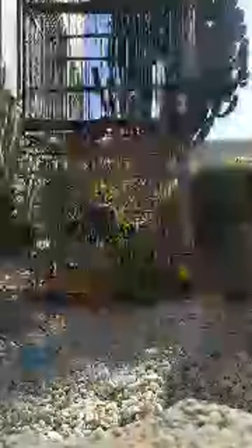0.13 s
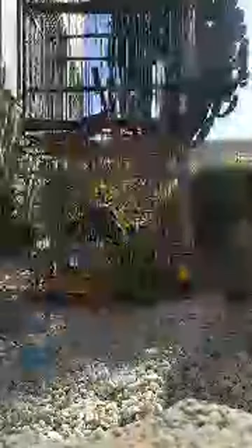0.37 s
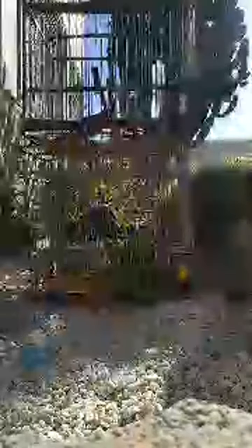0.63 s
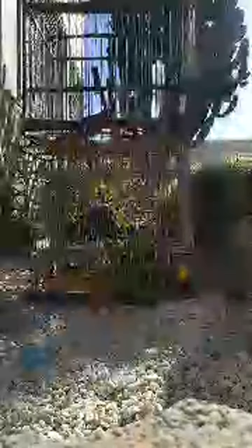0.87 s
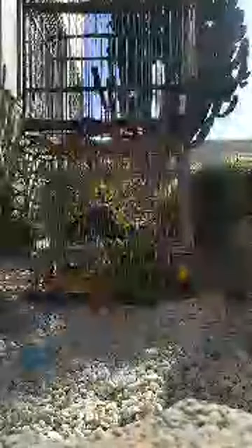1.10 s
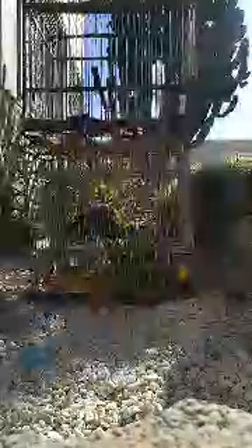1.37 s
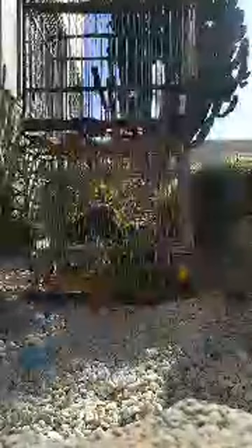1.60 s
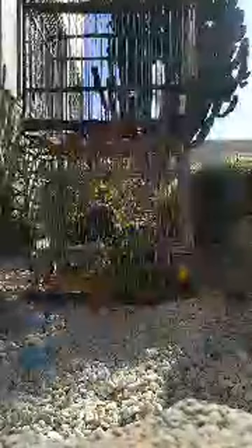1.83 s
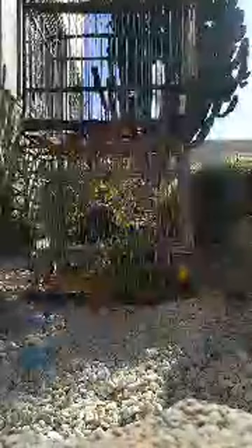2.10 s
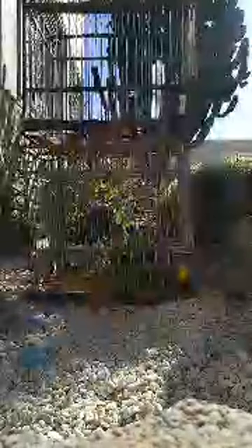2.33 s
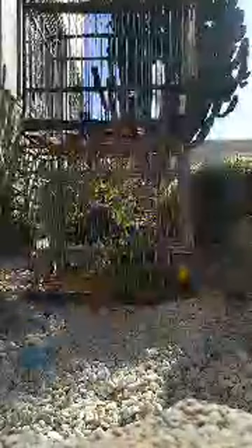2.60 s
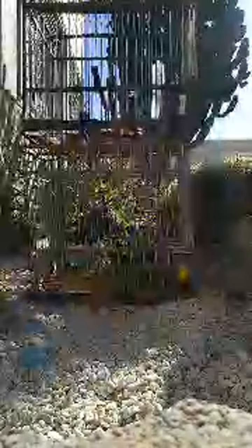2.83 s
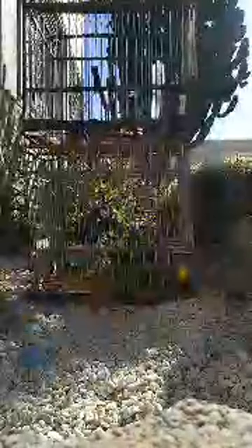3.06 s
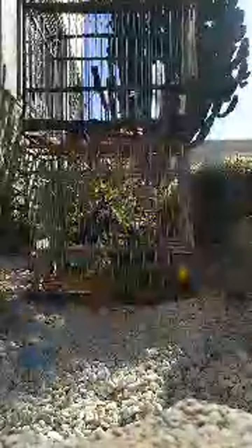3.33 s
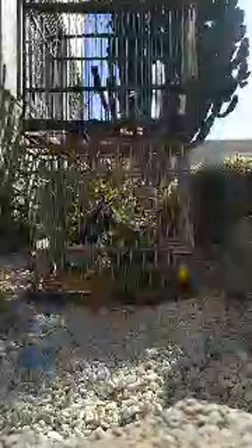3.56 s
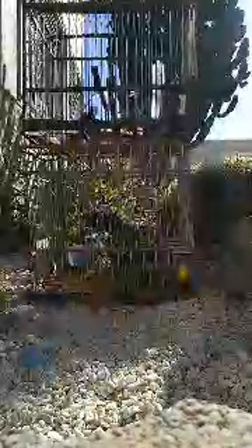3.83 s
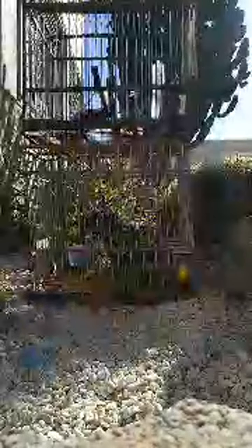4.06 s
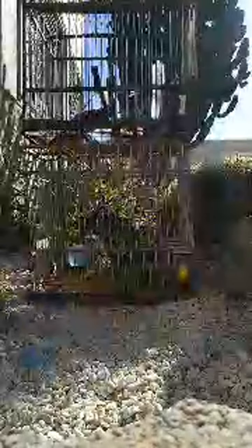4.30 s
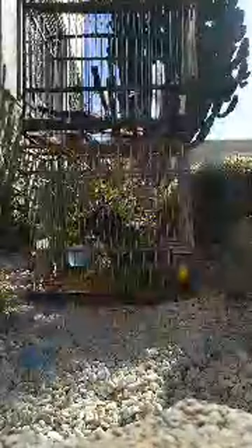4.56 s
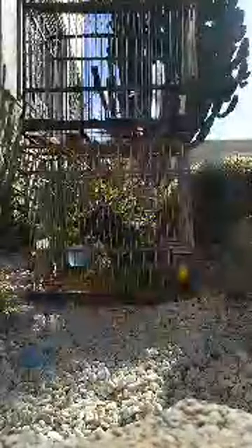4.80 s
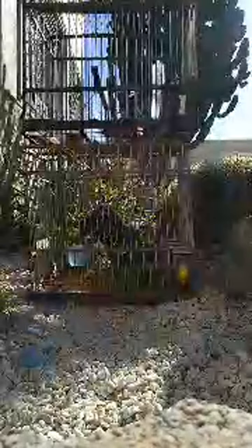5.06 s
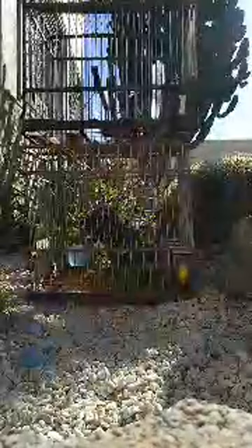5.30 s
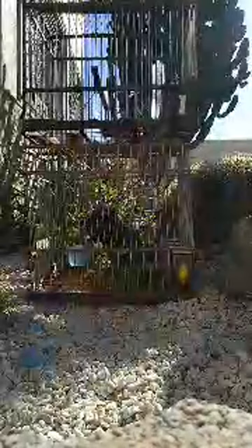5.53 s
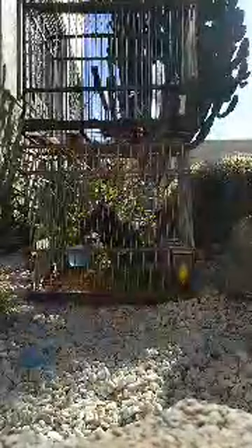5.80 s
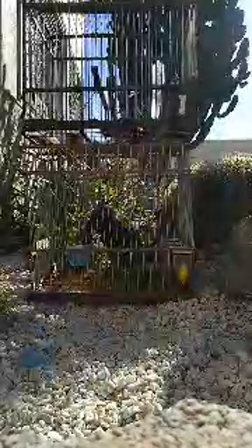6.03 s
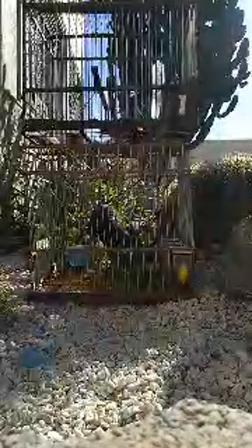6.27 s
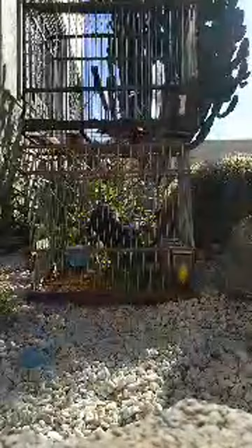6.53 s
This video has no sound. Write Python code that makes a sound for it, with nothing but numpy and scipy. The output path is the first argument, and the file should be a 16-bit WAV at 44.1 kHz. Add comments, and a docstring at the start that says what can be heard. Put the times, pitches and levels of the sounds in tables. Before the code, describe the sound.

Close bird song of clear whistles, husky chirps, raspy clucks and high squeaks outdoors, one hollow wooden thump, faint insects and a distant dove.

```python
"""A caged songbird sings in a walled garden: whistles, chirps, reedy notes, rasping chatter, chucks, squeaks.
Each note is a set of gliding partials, smeared by an unsteady membrane, with a broad hiss that follows its
loudness. Something wooden is knocked once (decaying modes), claws tick (noise bursts), a dove coos far off.
Echoes and a tail place these in the garden; insects shrill near 2 kHz, high hiss swells and far air murmurs,
all as shaped noise. Between some notes everything above the bass drops away for a moment."""
import sys
import numpy as np
from scipy import signal
from scipy.fft import rfft, irfft, next_fast_len
from scipy.io import wavfile
from scipy.ndimage import uniform_filter1d, map_coordinates

SR = 44100
rng = np.random.default_rng(int(sys.argv[2]) if len(sys.argv) > 2 else 0)


def dump_mix(stems):
    """Bounce the given channels to the path in sys.argv[1] as a 16-bit WAV at rate SR."""
    frames = np.atleast_2d(stems).T  # one column per channel
    limited = np.clip(frames, -1, 1)  # hard clip at full scale
    pcm = np.round(limited * 32767).astype(np.int16)
    wavfile.write(sys.argv[1], SR, pcm)


def boost_factor(decibels):
    """Convert a level in decibels to a linear amplitude factor."""
    exponent = np.asarray(decibels, float) / 20
    return 10 ** exponent


N = 293265
T = np.arange(N) / SR


def unit(x):
    """Scales to rms 1."""
    return x / np.sqrt(np.mean(np.abs(x) ** 2) + 1e-20)


def along(points, hz):
    """Reads a curve of (f/Hz, value) points on a log frequency axis."""
    f, value = np.transpose(points)
    return np.interp(np.log(hz + 1), np.log(f + 1), value)


def wobble(rate_hz, size=N):
    """A smooth random curve through rate_hz random knots a second."""
    knots = rng.standard_normal(int(size * rate_hz / SR) + 4)
    return map_coordinates(knots, [np.arange(size) * rate_hz / SR])


def shake(rate_hz, size):
    """A complex wobble: random in both strength and phase."""
    return (wobble(rate_hz, size) + 1j * wobble(rate_hz, size)) / np.sqrt(2)


def filtered(x, response):
    """Multiplies the spectrum of x by a response of frequency."""
    m = next_fast_len(N + SR // 2)
    return irfft(rfft(x, m) * response(np.fft.rfftfreq(m, 1 / SR)), m)[:N]


def hiss(spectrum):
    """White noise shaped to a spectrum, at rms 1."""
    return unit(filtered(rng.standard_normal(N), lambda hz: boost_factor(along(spectrum, hz))))


# broad hiss that follows each note's loudness, relative spectrum: f/Hz, level/dB per Hz
NOTE_HISS = [(700, -28), (1500, -17.5), (3000, -8), (5000, 4), (8300, -6.5), (9000, -11.5), (12000, -5.5),
             (15800, -14.5)]


def voice(notes, tones, rough, rough_hz, fray, scoop, round_, halo_db, hiss_db, arch,
          slide=0, lean=1, waver=0):
    """Partials on each note's pitch; an unsteady membrane smears them and spreads a halo, hiss follows them."""
    tone, hiss_swell = np.zeros(N + SR), np.zeros(N + SR)
    strength = np.sqrt(sum(boost_factor(db) ** 2 for _, db in tones) / 2)
    for start, length, middle_hz, db, *own_slide in notes:
        n, first = round(length * SR), round(start * SR)
        u = np.arange(n) / n
        way = np.clip(3 * u - 1.5, -1, 1)  # early to late
        # the pitch slides, and arches over the peak of effort
        pitch = middle_hz * (1 + (slide + sum(own_slide)) * way / 2 - arch * way ** 2)
        # the note slides up into place, less so when short
        pitch = pitch * (1 - scoop * min(1, length / .03) ** 2 * np.exp(-u * length / .005))
        # and sags as the air runs out
        pitch = pitch * (1 - .05 * np.exp((u - 1) * length / .004))
        # harsh notes waver in pitch
        phase = 2 * np.pi * np.cumsum(pitch * (1 + waver * wobble(70, n))) / SR
        swell = boost_factor(db) * np.sin(np.pi * u ** lean) ** round_  # lean over 1: slow swell, sudden stop
        steady = 1 - np.clip(rough + fray * u ** 2, 0, 1)  # positive fray: rougher as it ends
        for k, level_db in tones:
            clean = steady ** k  # upper partials smear first
            flutter = np.sqrt(clean) + np.sqrt(1 - clean) * shake(rough_hz * np.sqrt(k), n)
            flutter = flutter + boost_factor(halo_db) * shake(2200, n)
            partial = flutter * np.exp(1j * (k * phase + rng.uniform(0, 2 * np.pi)))
            tone[first:][:n] += boost_factor(level_db) / strength * swell * partial.real
        hiss_swell[first:][:n] += swell * (0.15 + u)  # weighted towards the note's end
    return tone[:N] + boost_factor(hiss_db) * hiss_swell[:N] * hiss(NOTE_HISS)


# clear notes: start t/s, length t/s, mid-note f/Hz, level/dB, then (whistles only) slide/share of f
WHISTLES = [(1.01, .038, 2895, -17, -.014), (1.052, .02, 2920, -22, .04), (1.135, .037, 2925, -14, -.022),
            (1.176, .027, 2940, -23, 0), (1.275, .037, 2915, -13, -.027), (1.316, .022, 2895, -19, .02),
            (3.136, .021, 3165, -18, -.057), (3.194, .035, 3205, -10, -.02), (3.23, .024, 3200, -12, -.012)]
PIPINGS = [(.28, .06, 1430, -34), (.365, .06, 1546, -31)]
REEDY = [(.022, .048, 2005, -26), (6.055, .027, 2018, -27), (6.175, .05, 2020, -26),
         (6.465, .03, 1795, -32), (6.497, .03, 1790, -20), (6.545, .056, 1786, -17),
         (6.632, .033, 1780, -32)]
LEAD_INS = [(1.502, .02, 2475, -27.5), (1.826, 0.024, 2520, -29), (2.716, 0.017, 2800, -30)]
# partials of the clear notes: multiple of the pitch, relative level/dB
WHISTLE_TONES = [(.5, -44), (1, 0), (1.5, -42), (2, -41)]
PIPING_TONES = [(1, -4), (2, -11.5), (3, -28.5), (4, -54)]
REEDY_TONES = [(1, -18.5), (2, 11), (3, -0.5), (4, -7.5), (5, -28.5)]  # hoarse notes share these
LEAD_IN_TONES = [(1, 2), (1.5, -14.5)]


def clear_notes():
    """Whistles, pipings, reedy notes and lead-ins to chirps: the membrane stays mostly steady."""
    clear = voice(WHISTLES, WHISTLE_TONES, rough=.02, rough_hz=265, fray=.15, scoop=.015, round_=.55,
                  halo_db=-30, hiss_db=-42, arch=.006, lean=1.4, waver=.003)
    clear += voice(PIPINGS, PIPING_TONES, rough=.048, rough_hz=121.2, fray=.057, scoop=.01, round_=.37,
                   halo_db=-19, hiss_db=-25, arch=.03, slide=-.03, waver=.006)
    clear += voice(REEDY, REEDY_TONES, rough=.039, rough_hz=134, fray=.03, scoop=.013, round_=1.0,
                   halo_db=-41, hiss_db=-26.5, arch=.0024)
    clear += voice(LEAD_INS, LEAD_IN_TONES, rough=.15, rough_hz=300, fray=.1, scoop=.01, round_=1.0,
                   halo_db=-26, hiss_db=-30.5, arch=0)
    return clear


# husky notes: start t/s, length t/s, mid-note f/Hz, level/dB, then (all but hoarse) slide/share of f
HOARSE = [(.074, .038, 1956, -21.5), (6.088, .037, 1998, -28.5), (6.228, .047, 1963, -26)]
CHIRPS = [(.567, 0.024, 3102, -23.5, .12), (.592, 0.019, 3356, -25, 0.011), (.648, 0.026, 3176, -23, 0.088),
          (.668, 0.02, 3507, -21, -0.11), (.748, .047, 3285, -21.5, .1), (1.528, 0.032, 2716, -19.5, -0.16),
          (1.558, 0.015, 2860, -24, 0.047), (1.852, 0.033, 2770, -21, -0.18),
          (1.882, 0.0083, 2800, -22.5, 0.21), (2.162, 0.022, 2900, -33.5, -0.2),
          (2.184, .032, 3243, -19, .015), (2.218, 0.015, 3177, -20.5, 0.00052),
          (2.742, 0.031, 3203, -15, 0.11), (2.778, .019, 3306, -30, -0.046), (3.092, 0.046, 3325, -18, .08)]
SQUEAKS = [(5.57, .044, 6880, -29, -0.045), (5.612, 0.061, 6560, -22, -0.033),
           (5.752, 0.073, 6730, -26.5, -0.085), (5.8, .023, 6410, -19, 0.028),
           (5.825, 0.035, 6330, -20, 0.025)]
SHRIEKS = [(5.535, .047, 5230, -29, -.07), (5.718, .042, 5560, -24, -0.025),
           (6.03, 0.056, 5790, -35.5, 0.026)]
CHURRS = [(4.33, .038, 2280, -30, 0.12), (4.364, .033, 2167, -24, -0.023),
          (4.598, .037, 2780, -27.5, 0.244), (4.792, 0.0438, 2810, -27.5, 0.15)]
# partials of a chirp: multiple of the pitch, relative level/dB
CHIRP_TONES = [(1, 0), (1.5, -24), (2, -26)]


def husky_notes():
    """Hoarse notes, chirps, squeaks, shrieks and churrs: fast flutter smears the partials into noise."""
    husky = voice(HOARSE, REEDY_TONES, rough=.046, rough_hz=643, fray=.42, scoop=.011, round_=.35,
                  halo_db=-41, hiss_db=-27.5, arch=.0015)
    husky += voice(CHIRPS, CHIRP_TONES, rough=.3, rough_hz=697, fray=.05, scoop=.1, round_=.64,
                   halo_db=-21.5, hiss_db=-28, arch=.045, lean=.87, waver=.02)
    husky += voice(SQUEAKS, [(1, 0)], rough=.13, rough_hz=350, fray=.25, scoop=.005, round_=.45,
                   halo_db=-18, hiss_db=-29, arch=0)
    husky += voice(SHRIEKS, [(1, 0)], rough=.45, rough_hz=800, fray=.2, scoop=.03, round_=.35,
                   halo_db=-9, hiss_db=-20, arch=0, waver=.03)
    husky += voice(CHURRS, [(1, 0)], rough=.5, rough_hz=680, fray=.05, scoop=.068, round_=.81,
                   halo_db=-14.5, hiss_db=-29, arch=.1, lean=.65)
    return husky


# rasps: start t/s, length t/s, mid-note f/Hz, level/dB
CHATTER = [(.845, .096, 1043, -22), (.925, 0.042, 1142, -27.5), (.957, .035, 1051, -23),
           (2.302, .056, 1111, -21), (2.35, .04, 1115, -21), (2.432, .039, 1027, -20.5),
           (2.51, .031, 1086, -19.5), (2.572, 0.04, 1081, -21), (2.65, .035, 1031, -22.5),
           (4.2, 0.06, 1066, -22.5), (4.258, 0.038, 1066, -23.5)]
CHUCKS = [(3.474, 0.041, 649, -22.5), (3.625, 0.0456, 628, -22.5), (3.8, 0.039, 637, -22),
          (4.024, 0.04, 634, -24.5)]
CLUCKS = [(4.982, .035, 498, -27.5), (5.155, .034, 500, -29.5), (5.355, .03, 499, -30)]
# partials of the rasps: multiple of the pitch, relative level/dB
CHATTER_TONES = [(1, -5), (2, 0), (2.5, -1), (3, 6.5), (3.5, -2), (4, -4), (5, -10), (7, -18)]
CHUCK_TONES = [(2, 0.5), (3, 17.5), (4, 15), (5, 18), (6, 14.5), (7, -41.5), (8, -26)]
CLUCK_TONES = [(3, -6.5), (4, -2), (5, -5), (6, -4.5), (7, -14)]


def rasping_notes():
    """Chatter, chucks and clucks: low pitches heard through their strong upper partials."""
    rasps = voice(CHATTER, CHATTER_TONES, rough=.07, rough_hz=300, fray=.5, scoop=.12, round_=.7,
                  halo_db=-15, hiss_db=-14, arch=.07, slide=.03, lean=1.2, waver=.035)
    rasps += voice(CHUCKS, CHUCK_TONES, rough=.34, rough_hz=274, fray=.1, scoop=.194, round_=1.3,
                   halo_db=-15, hiss_db=-24, arch=.0075, slide=.084, waver=.031)
    rasps += voice(CLUCKS, CLUCK_TONES, rough=.15, rough_hz=232, fray=.055, scoop=.052, round_=.61,
                   halo_db=-22, hiss_db=-32.5, arch=0, slide=-.022)
    return rasps


def songbird():
    """All the bird's notes through a tiny throat, which sends out no bass."""
    song = clear_notes() + husky_notes() + rasping_notes()
    return filtered(song, lambda hz: 1 / (1 + (990 / (hz + 1)) ** 16))


# the blow: t/s, level/dB
KNOCK = [(4.902, -26)]
# modes of the hollow wood: f/Hz, relative level/dB, t60 t/s
WOOD = [(330, -2, .17), (450, -3, .14), (600, 0, .13), (740, -2, .12), (1950, -10, .08)]


def knock():
    """One dull blow on a hollow wooden thing: its modes die away, rattling at random."""
    out, t = np.zeros(N + SR), T[:SR // 4]
    for start, db in KNOCK:
        ring = np.zeros(len(t))
        for hz, level_db, t60 in WOOD:
            rattle_db = 4.5 * wobble(120, len(t))
            ring += boost_factor(level_db - 60 * t / t60 + rattle_db) * np.sin(2 * np.pi * hz * t)
        onset = 1 - np.exp(-t / .0014)
        out[round(start * SR):][:len(t)] += boost_factor(db) * ring / np.abs(ring).max() * onset
    return out[:N]


# ticks on the bars: t/s, level/dB
TICKS = [(0.402, -35), (1.1867, -35.5), (4.3722, -40)]
# relative spectrum of a tick: f/Hz, level/dB per Hz
CLAW = [(300, -11), (2000, 6), (6000, -6), (15800, -17.5)]


def claw_ticks():
    """Claws tick on the cage: noise bursts that start at once and fall 60 dB in 20 ms."""
    burst, t = np.zeros(N + SR), T[:SR // 4]
    for start, db in TICKS:
        burst[round(start * SR):][:len(t)] += boost_factor(db - 60 * t / .02)
    return burst[:N] * hiss(CLAW)


# coos: start t/s, length t/s, mid-note f/Hz, level/dB
COOS = [(1.772, 0.016, 930, -49), (1.844, 0.029, 950, -59), (4.1, .075, 598, -58.5), (4.18, .023, 625, -48),
        (4.325, 0.052, 599, -44), (4.43, 0.024, 570, -55), (4.472, .064, 565, -49.5),
        (4.553, 0.036, 598, -53), (6.465, 0.03, 593, -56.5)]


def dove():
    """Soft far coos: single partials, blurred by distance into a slow flutter."""
    return voice(COOS, [(1, 0)], rough=.25, rough_hz=50, fray=.05, scoop=.01, round_=.8,
                 halo_db=-45, hiss_db=-50, arch=.01)


# cage floor, ground and walls: delay t/s, level/dB
ECHOES = [(.0044, -19), (.0072, -19), (.022, -16), (.038, -22)]
# decay of the tail: f/Hz, t60 t/s
GARDEN = [(300, .7), (1500, .9), (3000, .44), (6000, .9), (14000, .12)]


def garden(x, tail_db):
    """A few near reflections, then a tail in which each frequency dies at its own speed."""
    hz, t, z = signal.stft(rng.standard_normal(SR), SR, nperseg=256)
    decay = boost_factor(-60 * t / along(GARDEN, hz)[:, None])
    tail = signal.istft(z * decay, SR, nperseg=256)[1][:SR]
    tail = tail * np.clip(T[:SR] / .027, 0, 1)  # builds up as far walls answer
    tail = tail / np.linalg.norm(tail)
    near = np.zeros(SR // 10)
    near[0] = 1  # the direct sound
    for delay, db in ECHOES:
        near[round(delay * SR)] = boost_factor(db)
    scattered = x * unit(wobble(550))  # many uneven paths through foliage blur pure notes
    return signal.fftconvolve(x, near)[:N] + boost_factor(tail_db) * signal.fftconvolve(scattered, tail)[:N]


# the shrill bands: f/Hz, width f/Hz, relative level/dB
INSECTS = [(1952, 217, 1.5), (2550, 400, -6)]


def insects(level_db):
    """Insects shrill: noise in two bands, flickering about a slowly changing level."""
    def bands(f):
        return sum(boost_factor(db) / (1 + ((f - hz) / width * 2) ** 4) ** .5 for hz, width, db in INSECTS)
    shrill = unit(filtered(rng.standard_normal(N), bands))
    return shrill * boost_factor(level_db + 2.8 * wobble(30))


# swells of high hiss: start t/s, hold t/s, level/dB
HISS_SWELLS = [(0, 0.01, -45), (.4, .12, -54), (0.855, 0.077, -52.5), (1.711, 0.031, -57),
               (2.496, .08, -47), (3.69, 0.9, -65), (4.186, 0.15, -45), (4.394, 0.92, -50),
               (5.633, 0.044, -46.5), (5.864, 0.44, -63)]
# relative spectrum of the high hiss: f/Hz, level/dB per Hz
HIGH_HISS = [(600, -38), (1200, -21.5), (2000, -33.5), (3500, 1), (7000, -1.5), (8500, -8), (9200, -14.5),
             (12000, -18), (15800, -13.5)]


def high_hiss():
    """Swells of uneven high hiss: each rises, holds, then falls more slowly."""
    rise_db_per_s, fall_db_per_s = 144.5, 65.5
    swell = np.zeros(N)
    for start, hold, db in HISS_SWELLS:
        before, after = np.maximum(start - T, 0), np.maximum(T - start - hold, 0)
        swell += boost_factor(db - rise_db_per_s * before - fall_db_per_s * after)
    uneven = unit(hiss(HIGH_HISS) * boost_factor(.74 * wobble(3.8) + 1.8 * wobble(200)))
    return uneven * swell


# far traffic and breeze, relative spectrum: f/Hz, level/dB per Hz
AIR = [(25, -25), (45, -28.5), (72, -4.5), (110, -11.5), (200, -10), (320, -16), (700, -12.5),
       (1600, -12.5), (3000, -30.5)]


def far_air(level_db):
    """Far traffic and breeze: low-heavy noise drifting about its level."""
    return hiss(AIR) * boost_factor(level_db + 1.5 * wobble(8) + 2.2 * wobble(3.5))


# background level over time: t/s, level/dB
BACKGROUND_LEVEL = [(0, -52), (.45, -50.5), (.87, -57.5), (1.15, -61.5), (1.65, -51.5), (2.3, -55),
                    (2.52, -52), (2.8, -51.5), (3.1, -57), (3.45, -55.5), (3.65, -47), (4.06, -50),
                    (4.26, -47.5), (5.1, -46), (5.43, -48), (5.74, -58.5), (6.3, -52.5), (6.65, -54.5)]


def backdrop():
    """Insects on the background level, high hiss, and far air that follows part of the same rise and fall."""
    level_db = np.interp(T, *np.transpose(BACKGROUND_LEVEL))
    air_db = -64 + .35 * (level_db - level_db.mean())
    return insects(level_db) + high_hiss() + far_air(air_db)


def scene():
    """Bird, knock, claws and dove in the garden, over the backdrop."""
    sources = songbird() + knock() + claw_ticks() + dove()
    return (garden(sources, tail_db=-20) + backdrop())[None]


# brief drops: start t/s, end t/s, level/dB
DIPS = [(.272, .279, -10), (.53, .566, -13), (1.732, 1.824, -12), (2.047, 2.155, -18), (2.99, 3.09, -13),
        (3.992, 4.023, -16), (4.762, 4.79, -10), (5.138, 5.155, -10), (5.296, 5.354, -19),
        (5.476, 5.535, -16), (6.405, 6.462, -14)]


def brief_dips(x):
    """The level dips briefly, all but the bass, with 3 ms edges."""
    gain_db = sum(db * ((T > start) & (T < end)) for start, end, db in DIPS)
    bass = filtered(x, lambda hz: 1 / (1 + (hz / 300) ** 1.5))
    return bass + (x - bass) * uniform_filter1d(boost_factor(gain_db), size=130)


def roll_off(x):
    """The treble ends steeply here."""
    return signal.sosfilt(signal.butter(12, 16670, fs=SR, output="sos"), x)


def record(dry):
    """Brief dips above the bass, then a steep band limit at 15830 Hz."""
    dipped = brief_dips(dry[0])
    mix = filtered(dipped, lambda hz: hz < 15830)[None]
    return roll_off(mix)


dry = scene()
out = record(dry)
dump_mix(out)
```